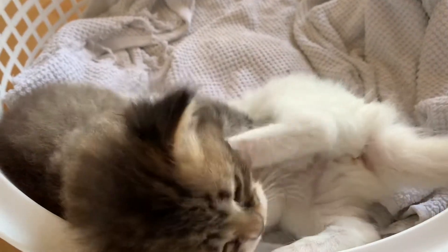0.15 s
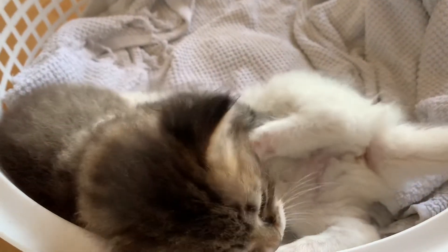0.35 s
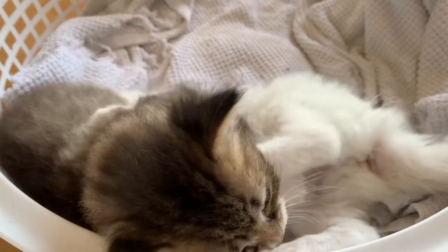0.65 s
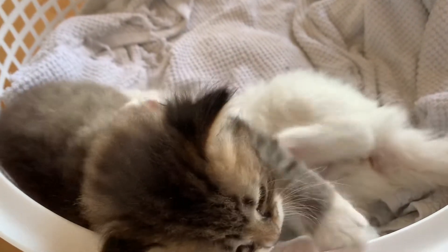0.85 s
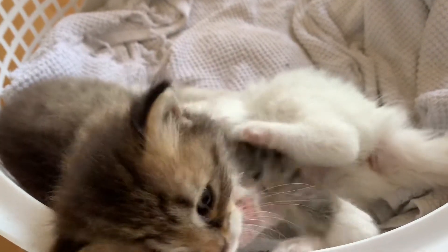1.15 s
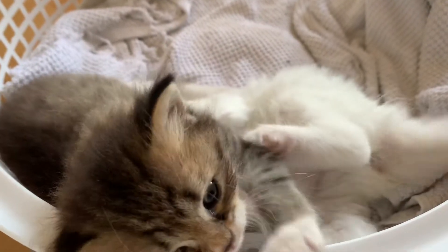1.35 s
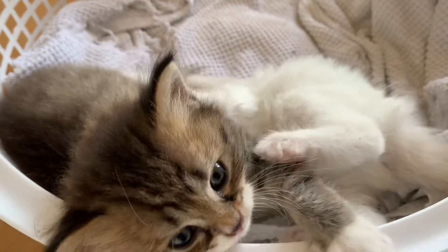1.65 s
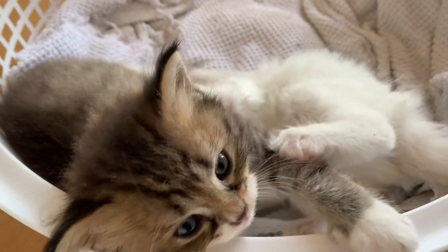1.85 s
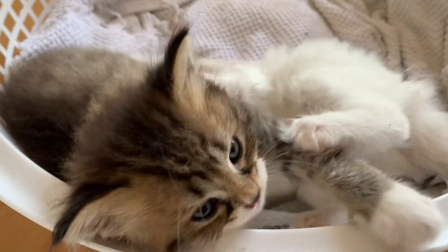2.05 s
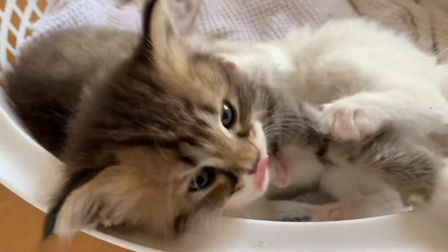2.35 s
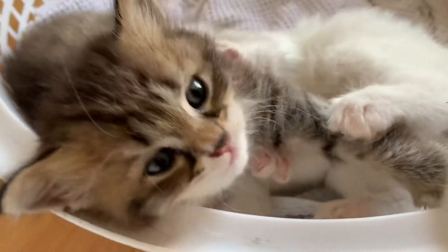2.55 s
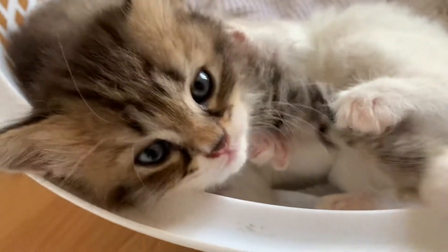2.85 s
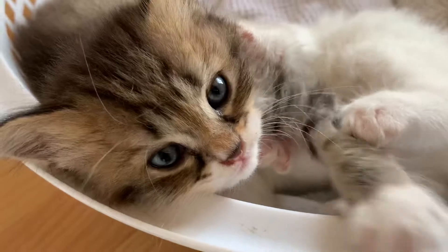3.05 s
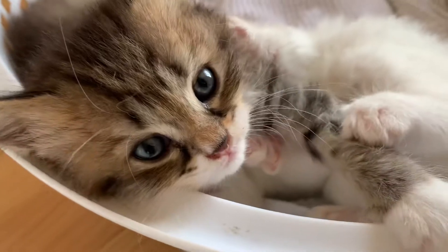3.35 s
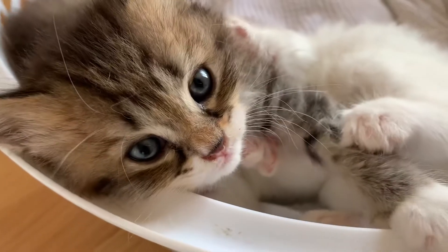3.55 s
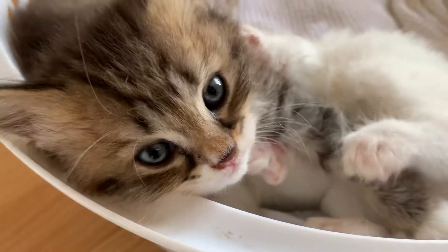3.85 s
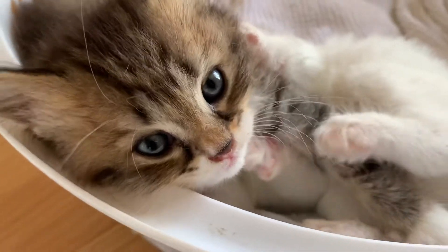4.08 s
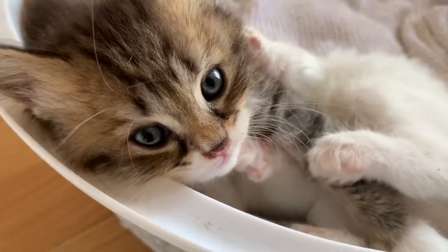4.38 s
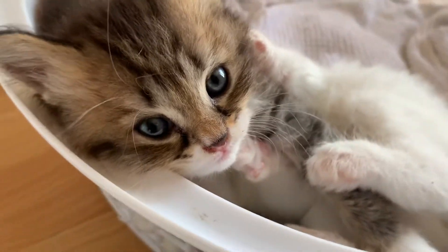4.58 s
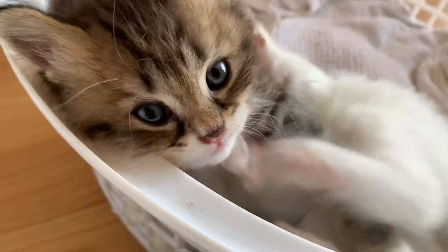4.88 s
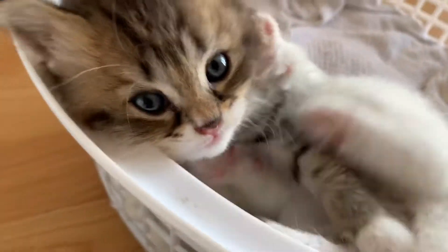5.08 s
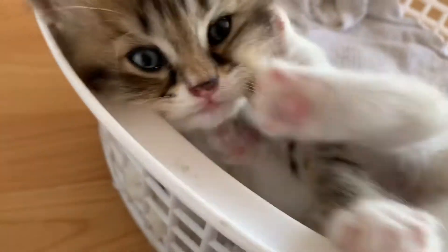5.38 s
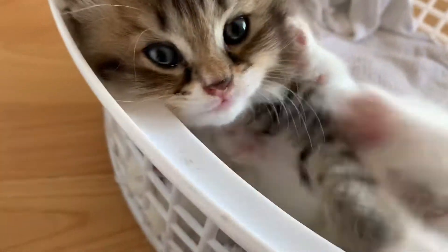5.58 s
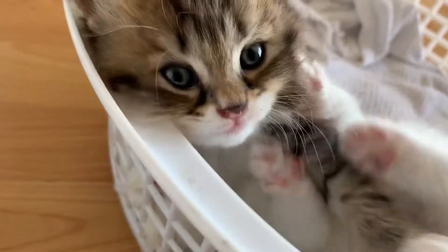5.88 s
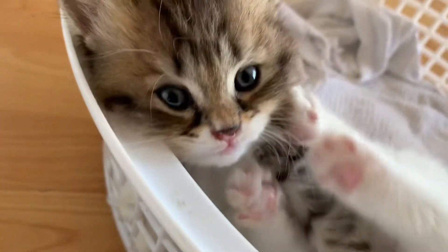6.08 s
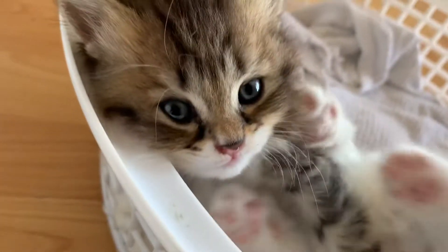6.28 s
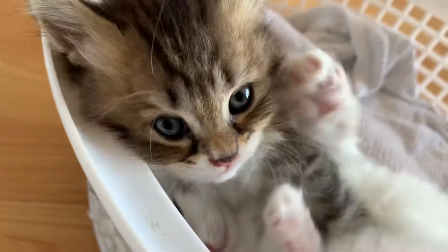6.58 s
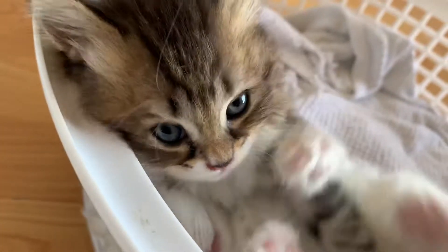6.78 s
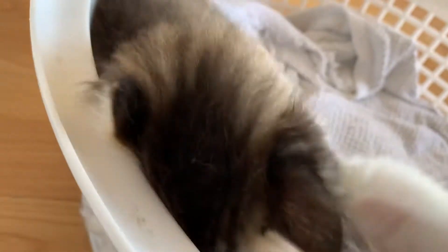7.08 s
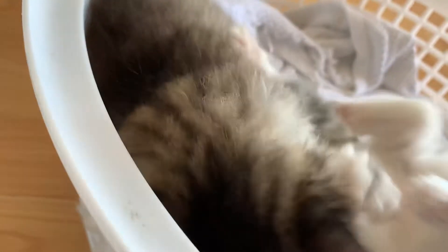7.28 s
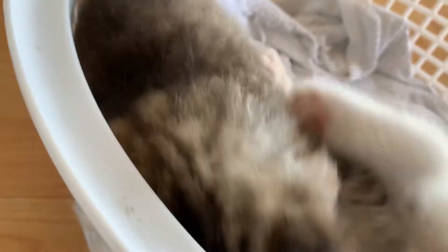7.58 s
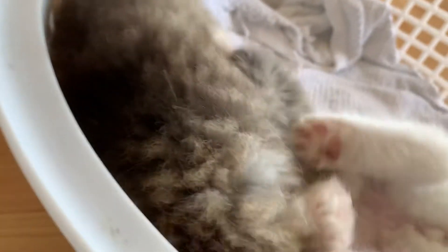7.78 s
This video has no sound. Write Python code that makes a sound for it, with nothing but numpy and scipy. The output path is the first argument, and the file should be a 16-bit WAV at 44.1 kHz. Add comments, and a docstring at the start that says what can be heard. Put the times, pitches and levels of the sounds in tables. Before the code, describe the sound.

Two kittens wrestle on towels in a plastic basket, with soft rustles, paw scuffs and light claw clicks over a low refrigerator hum.

```python
"""Two kittens wrestle on towels in a plastic laundry basket, close to a phone's two microphone ports.
Claws tick on the plastic, bodies bump it, fur and cloth rustle, paws scuff and rub along the wall.
One kitten gives a thin squeak. Further off to the left, a few taps ring in the room.
Behind it all, a little to the right, a refrigerator hums in the room's air and faint hiss."""
import sys
import numpy as np
from scipy import signal
from scipy.fft import rfft, irfft
from scipy.io import wavfile
from scipy.ndimage import map_coordinates

SR = 44100
rng = np.random.default_rng(int(sys.argv[2]) if len(sys.argv) > 2 else 0)


def log_audio(samples):
    """Write samples as a 16-bit WAV file to the path given in sys.argv[1]."""
    # one column per channel
    frames = np.atleast_2d(samples).T
    # limit to full scale, then quantise
    limited = np.clip(frames, -1, 1)
    pcm = np.round(limited * 32767).astype(np.int16)
    wavfile.write(sys.argv[1], SR, pcm)


N = 349624
TIME = np.arange(N) / SR
PORT_GAP_S = 0.000481  # travel time between the two ports
NEAR_LAG_S = 0.000295  # sound from the basket reaches the right port first


# claws on the basket, close up:
# t/s, ring level/dB, ring f/Hz, snap level/dB, snap f/Hz, tick level/dB, side (- left, + right)
CLAW_HITS = [(.7058, -51.5, 2560, -52.5, 3600, -45, 0.66), (.7295, -61.5, 2480, -59, 3610, -66, 0.52),
             (1.114, -69.5, 2280, -68.5, 4800, -70, 1), (1.162, -66, 2480, -73, 3900, -76, .63),
             (1.298, -65, 1810, -68, 3500, -73, 0.69), (1.3235, -66.5, 2700, -72, 3490, -77.5, 0.59),
             (2.1995, -52, 2950, -43.5, 4540, -48, -0.95), (2.232, -48.5, 2855, -50, 4520, -51, -1),
             (2.251, -52, 2700, -52, 4280, -55, -0.84), (2.278, -50.5, 2600, -50, 4400, -59, -1.3),
             (2.366, -62, 2700, -53, 4900, -59, -1.1), (3.091, -63, 2800, -53.5, 3570, -57.5, 0.59),
             (3.5345, -59, 2090, -60.5, 5100, -54.5, -1), (3.538, -61, 2030, -61, 5090, -58, -1.02),
             (3.7201, -55, 1810, -56, 4234, -46.5, 0.65), (4.8413, -50, 2520, -36, 5830, -35.5, 0.62),
             (4.8489, -52, 2410, -43.5, 4056, -47.5, 0.47), (4.858, -56.5, 2410, -60.5, 3750, -71.5, 0.74),
             (4.8684, -48.5, 2550, -45, 4300, -42.5, 0.56), (4.8822, -46, 2460, -54, 3847, -53, 0.77),
             (5.194, -49.5, 2294, -79, 3510, -76, -1), (5.1986, -40.5, 2310, -50, 4510, -52, -1.1),
             (5.242, -63, 2300, -63, 3750, -68, -0.71), (5.4818, -59.5, 2200, -55, 3620, -91, -0.21),
             (5.5501, -54.5, 1700, -60, 3970, -66, 0.52), (5.581, -66, 2600, -63, 3915, -68, 0.83)]
def claws():
    """Claws strike the plastic; every spot has its own pitch."""
    return clicks(CLAW_HITS, snap_t60=0.021, tick_t60=0.019, scatter=1.0, echo_s=0.0014)


# modes of the plastic: multiple of the ring pitch, t60/s, relative level/dB
PLASTIC_MODES = [(.27, .014, -17.5), (.56, 0.007, -11), (.88, 0.0036, -5), (1, 0.0088, -0.5),
                 (1.32, 0.018, -14)]
def clicks(table, snap_t60, tick_t60, scatter, echo_s):
    """Each contact is a hollow ring of the plastic, a hard snap and a bright tick."""
    out, t = np.zeros((2, N)), TIME[:SR // 20]
    bite = np.minimum(t / 0.0004, 1)  # a claw takes a moment to bite in
    shorten = np.sqrt(0.004 / 0.05)  # each 50 ms part carries the energy of 4 ms at its level
    for start, ring_db, ring_hz, snap_db, snap_hz, tick_db, side in table:
        ring = unit(sum(undb(db) * fade(t60) * np.sin(2 * np.pi * (ratio * ring_hz * t + rng.random()))
                        for ratio, t60, db in PLASTIC_MODES))
        snap = band(band(spray(snap_t60)[0], 3200, 8500), snap_hz / 1.23, snap_hz * 1.23, order=1)
        tick = band(band(spray(tick_t60)[0], 7200, 20000), 8000, 11200, order=1)
        click = undb(ring_db) * ring + bite * (undb(snap_db) * snap + undb(tick_db) * tick)
        add(out, start, ports(shorten * click, side * PORT_GAP_S, scatter, echo_s))
    return out


# bodies against the basket, close up: t/s, thud level/dB, knock level/dB
BODY_BUMPS = [(4.848, -44, -63), (4.881, -68, -58.5), (5.198, -55, -55), (5.548, -55, -63),
              (6.276, -60, -59)]
def bumps():
    """Under a kitten's weight the basket floor thuds and its wall gives a dull knock."""
    out = np.zeros((2, N))
    for start, thud_db, knock_db in BODY_BUMPS:
        thud = undb(thud_db) * burst(47, 200, t60=0.078)
        knock = undb(knock_db) * burst(380, 1200, t60=0.022)
        add(out, start, ports(thud + knock, NEAR_LAG_S, scatter=0.22, echo_s=0.0022))
    return out


# fur on towels, close up: t/s, length/s, level/dB, tilt/dB per octave, share spent swelling
TOWEL_STROKES = [(.708, 0.026, -54.5, 0.5, .3), (1.26, 0.38, -69, -4, .4), (2.2, 0.12, -53, 7, .2),
                 (3.09, 0.18, -65.5, 1.5, .35), (3.538, 0.042, -57, 4, .3), (3.53, 0.27, -65, 2.5, .2),
                 (3.688, 0.053, -54.5, -1, .2), (3.712, 0.077, -49.5, 4.5, .45),
                 (4.806, 0.098, -54.5, 2, .45), (4.83, 0.17, -68.5, 1, .3), (5.2, 0.2, -73.5, 2, .45),
                 (5.45, 0.074, -61, -0.5, .4), (5.505, 0.12, -59.5, 2.5, .22), (5.9, 0.83, -69, 0, .3),
                 (6.68, 0.21, -66, 0, .45), (6.88, 0.11, -64.5, 4, .3), (6.95, 0.24, -71.5, -4, .3)]
# spectrum of the cloth: f/Hz, relative level/dB
TOWEL_SPECTRUM = [(300, -12), (700, 4), (1300, 11), (2400, 8.5), (3000, 3), (4200, 7), (7000, 0.5),
                  (9000, 4), (13500, -6), (16000, -22)]
def towel_rustle():
    """Fur and towels slide over each other with a fine grain."""
    return strokes(TOWEL_STROKES, TOWEL_SPECTRUM, grain_db=1.5, judder_db=1.6, scatter=0.74)


# paws on the basket wall: t/s, length/s, level/dB, tilt/dB per octave, share spent swelling
PAW_STROKES = [(.81, 0.083, -58.5, 9.5, 0), (1.113, 0.02, -62, 3.5, 0), (1.42, 0.1, -63.5, 1.5, .4),
               (1.89, 0.095, -63.5, -3, 0.16), (1.98, 0.24, -67, 1.5, 0.44), (2.087, 0.17, -58, 0.5, .1),
               (2.165, 0.28, -53, 2.5, 0), (2.194, 0.14, -50, 2.5, 0.04), (2.25, 0.33, -62, 2, 0.2),
               (2.483, 0.031, -65.5, -2, .1), (2.61, 0.28, -62.5, -0.5, 0), (2.675, 0.078, -61.5, 0, 0.23),
               (2.87, 0.095, -63, -1, 0), (6.275, 0.057, -56.5, -2, 0.24), (6.29, 0.12, -60.5, -4, 0)]
# spectrum of the scuffed wall: f/Hz, relative level/dB
WALL_SPECTRUM = [(300, -15.5), (800, 4), (1500, 1), (2000, 2), (2600, 5), (3300, -1.5), (4400, 3),
                 (7000, -4.5), (8400, -3.5), (11000, -15.5), (14000, -19.5), (16000, -46)]
def paw_scuffs():
    """Paws drag along the plastic with a coarser grain and more judder."""
    return strokes(PAW_STROKES, WALL_SPECTRUM, grain_db=3.0, judder_db=2.5, scatter=1.7)


def strokes(table, spectrum, grain_db, judder_db, scatter, judder_per_s=24):
    """Broad rustles that judder as the paw grips and slips."""
    out = np.zeros((2, N))
    for start, length, db, tilt_db, rise in table:
        grains, swell = friction(length, rise, grain_db)
        grip = unit(undb(judder_db * walk(judder_per_s, len(swell))))
        stroke = undb(db) * swell * grip * colour(grains, spectrum, tilt_db)
        add(out, start, ports(stroke, NEAR_LAG_S, scatter, echo_s=0.02))
    return out


def friction(length, rise, grain_db, snags_per_s=31, snag_db=16):
    """Fibres catch and let go, claws snag in the weave: grainy noise, and the swell of one stroke."""
    t = TIME[:SR]
    top_s = length * np.clip(rise, 0.03, 0.9)
    swell = np.interp(t, [0, top_s, length], [0, 1, 0]) ** np.where(t < top_s, 0.7, 0.42)
    snags = undb(snag_db) * (rng.random(len(t)) < snags_per_s / SR)
    grains = rng.standard_normal(len(t)) * (undb(grain_db * walk(300, len(t))) + snags)
    return grains, swell


# slightly squeaky rubs in the basket, and short rings after the knocks at 2.09 s and 6.28 s: t/s, length/s,
# level/dB, f/Hz, bandwidth/Hz
NARROW_RUBS = [(0.795, 0.028, -62.5, 2324, 700), (0.803, 0.044, -58, 8150, 300),
               (1.234, 0.013, -63, 1830, 200), (1.278, 0.31, -69, 3730, 650),
               (1.437, 0.19, -61.5, 3380, 755), (1.811, 0.09, -72.5, 1920, 404),
               (1.904, .06, -70.5, 2320, 600), (2.085, .035, -50.5, 1530, 400),
               (2.194, 0.023, -41.5, 4500, 600), (2.206, 0.099, -48, 3740, 2000),
               (3.334, 0.24, -74.5, 3670, 800), (4.222, 0.3, -79, 3700, 1000),
               (4.662, 0.096, -80.5, 5270, 900), (4.754, .05, -82, 3000, 400),
               (6.278, 0.0083, -60, 3310, 300), (6.279, 0.091, -65, 2470, 600),
               (6.568, 0.17, -72.5, 5270, 1006)]
def rubs():
    """Friction sings in one narrow, wandering resonance."""
    out = np.zeros((2, N))
    for start, length, db, hz, width in NARROW_RUBS:
        grains, swell = friction(length, rise=0.3, grain_db=4.0)
        wander = np.cumsum(1 + 0.012 * walk(21, len(grains)))  # uneven read speed bends the pitch
        sing = map_coordinates(band(grains, hz - width / 2, hz + width / 2), [wander])
        add(out, start, ports(undb(db) * swell * sing, NEAR_LAG_S, scatter=2.4, echo_s=0.0089))
    return out


def squeak():
    """A kitten's thin, shaky whistle shoots up, wavers and sags; its octave flares as it lets go."""
    top_s, top_hz, hold_s = 0.464, 4170, 0.033
    rise_hz_per_s, sag_hz_per_s, waver_hz = 55000, 14000, 55
    sag_time = TIME - top_s - hold_s
    below_top = rise_hz_per_s * np.maximum(top_s - TIME, 0) + sag_hz_per_s * np.maximum(sag_time, 0)
    waver = waver_hz * np.cos(2 * np.pi * sag_time / hold_s) * np.clip(0.5 - sag_time / hold_s, 0, 1)
    hz = np.maximum(top_hz - below_top + waver, 0)
    phase = 2 * np.pi * np.cumsum(hz * (1 + 0.004 * walk(60))) / SR
    swell = np.exp(-0.5 * (sag_time / 0.04) ** 2) * (hz / top_hz) ** 2 * undb(1.2 * walk(60))
    octave = undb(1) * np.exp(-((sag_time - 0.016) / 0.012) ** 2)
    call = np.sqrt(2) * undb(-71) * swell * (np.sin(phase) + octave * np.sin(2 * phase))
    return ports(call, NEAR_LAG_S, scatter=0.45, echo_s=0.0064)[:, :N]


# taps further off in the room, and at 6.28 s a knock on the basket itself: t/s, ring level/dB, ring f/Hz, snap
# level/dB, snap f/Hz, tick level/dB
FAR_TAPS = [(.807, -59.5, 2500, -58, 3500, -67), (0.8131, -49, 2270, -49.5, 4170, -55),
            (1.8232, -58.5, 1920, -74.5, 3690, -80.5), (2.024, -78.5, 2300, -65, 4400, -72),
            (2.069, -70, 2200, -64.5, 4380, -65.5), (2.092, -54.5, 2474, -55, 4630, -65),
            (2.18, -50.5, 2290, -57.5, 5200, -65), (2.4865, -55.5, 2570, -53, 3900, -68),
            (2.495, -58, 3010, -54.5, 3700, -72), (2.6201, -58, 2550, -55, 4400, -68),
            (2.722, -70, 2530, -61, 5200, -65), (2.8596, -64, 2780, -51.5, 5450, -63),
            (2.9702, -59, 2130, -61.5, 5700, -83), (6.276, -46.5, 2580, -57, 3300, -53.5)]
def far_taps():
    """Hard contacts off to the left, with longer reflections than the claws."""
    from_left = [(*tap, -1) for tap in FAR_TAPS]
    return clicks(from_left, snap_t60=0.019, tick_t60=0.022, scatter=0.86, echo_s=0.004)


# the strongest drone, the compressor's second order: t/s, relative level/dB
DRONE_CURVE = [(0.0, -43.5), (0.52, -41), (0.65, -46.5), (1.43, -42.5), (1.55, -58.5), (1.7, -46.5),
               (3.59, -48.5), (3.77, -57), (4.28, -38.5), (4.36, -46), (5.55, -43.5), (5.79, -70),
               (5.83, -48), (6.48, -40), (6.62, -58), (7.12, -38.5)]
# tones of a loose panel, the compressor, the mains and the cabinet: f/Hz, relative level/dB, waver 0-1
PANEL_TONES = [(86.4, -51.5, 0.5)]
COMPRESSOR_TONES = [(48.48, -43, 0.24), (147.6, -56.5, 0.8), (192.5, -49, 0.2), (249.4, -69, 0.3),
                    (396.2, -76, 0.6), (486.4, -80.5, 0.8)]
MAINS_TONES = [(99.5, -54.5, 0.29), (200.4, -57.5, 0.057), (300.1, -60, 0.2), (398.4, -72, .3)]
CABINET_TONES = [(70.5, -64.5, 1), (114.2, -64.5, 1), (245.3, -60.5, 1), (250.9, -59, 0.86),
                 (267.3, -64.5, 0.73), (288.7, -61.5, .6), (296.8, -65.5, 0.62), (342.8, -73.5, 0.82),
                 (389, -70, 0.94)]
# the refrigerator's rumble: f/Hz, relative level/dB
RUMBLE_SPECTRUM = [(20, -28.5), (40, -21.5), (60, 0.5), (88, -0.5), (125, -7.5), (165, -7.5), (205, -5.5),
                   (280, -8.5), (350, -16), (450, -27), (700, -50), (2000, -67)]
def refrigerator():
    """Compressor, mains and cabinet hum over a low rumble, a little louder at the right port."""
    drone_db = np.interp(TIME, *np.transpose(DRONE_CURVE)) - 1
    tones = hum([(96.7, drone_db, 0.21)] + PANEL_TONES, waver_per_s=3.1)
    tones += hum(COMPRESSOR_TONES, waver_per_s=0.91)
    tones += hum(MAINS_TONES, waver_per_s=0.47)
    tones += hum(CABINET_TONES, waver_per_s=1.33)
    rumble = undb(-48.5) * colour(diffuse(N), RUMBLE_SPECTRUM) * undb(0.66 * walk(2.0))
    return (tones + rumble) * undb([[-1.3], [1.2]])


def hum(tones, waver_per_s):
    """Tones waver on their own; standing waves make the ports differ more as the pitch rises."""
    out = np.zeros((2, N))
    for hz, db, waver in tones:
        drift = (walk(waver_per_s) + 1j * walk(waver_per_s)) / np.sqrt(2)
        sway = unit(1 - min(waver, 1) / 2 + waver * drift)
        port_phase = np.array([[1], [-1]]) * hz * PORT_GAP_S * (2.7 * walk(waver_per_s) - 0.9)
        phase = 2 * np.pi * (hz * TIME + rng.random()) + port_phase
        out += np.sqrt(2) * undb(db) * np.real(sway * np.exp(1j * phase))
    return out


# the room's air, and the hiss at each port: f/Hz, relative level/dB
AIR_SPECTRUM = [(100, -5), (400, -3.5), (650, 0.5), (850, -4), (1050, -7), (1400, -15), (2000, -23.5),
                (5000, -43), (16000, -53)]
HISS_SPECTRUM = [(1000, 7), (3500, 4), (7000, 1), (10000, 4), (14000, -2.5), (15500, -14)]
def room_tone():
    """Air from all sides, a little louder at the left port, and a faint even hiss."""
    air = undb(-67.5) * colour(diffuse(N), AIR_SPECTRUM) * undb(0.5 * walk(0.82))
    hiss = undb(-79) * colour(rng.standard_normal((2, N)), HISS_SPECTRUM)
    return air * undb([[1.2], [-1.2]]) + hiss


def room(pair, t60_low, t60_high):
    """The room answers with a diffuse tail whose treble dies sooner."""
    t, noise = TIME[:SR], diffuse(SR)
    low = signal.sosfiltfilt(signal.butter(2, 6000, fs=SR, output="sos"), noise)
    tail = low * undb(-60 * t / t60_low) + (noise - low) * undb(-60 * t / t60_high)
    build_up = 1 - np.exp(-t / 0.0063)
    return signal.fftconvolve(pair, unit(tail * build_up) / np.sqrt(SR), axes=1)[:, :N]


def ports(x, lag_s, scatter, echo_s):
    """A sound at the two ports, the left late by about lag_s, with reflections dying over echo_s."""
    echoes = spray(np.log(1000) * echo_s)
    scattered = signal.fftconvolve(x[None], echoes / np.sqrt(echoes.shape[1]), axes=1)
    n = scattered.shape[1]
    lags = PORT_GAP_S + np.array([[0.5], [-0.5]]) * (lag_s + 0.00002 * rng.standard_normal())
    straight = irfft(rfft(x, n) * np.exp(-2j * np.pi * np.fft.rfftfreq(n, 1 / SR) * lags), n)
    return (straight + scatter * scattered) / np.hypot(1, scatter)


def diffuse(n):
    """Noise from all sides: alike at both ports in the bass, unrelated in the treble."""
    alike = np.sinc(2 * np.fft.rfftfreq(n, 1 / SR) * PORT_GAP_S)
    mid, side = rfft(rng.standard_normal((2, n))) * np.sqrt([1 + alike, 1 - alike + 1e-9])
    return irfft([mid + side, mid - side], n) / np.sqrt(2)


def spray(t60):
    """Two unrelated dying showers of tiny impulses, each with an even spectrum; rms 1."""
    decay = undb(-60 * TIME[:SR // 20] / t60)
    spectrum = rfft(rng.standard_normal((2, len(decay))) * decay)
    return unit(irfft(spectrum / np.abs(spectrum), len(decay)) * np.sqrt(decay))


def burst(low_hz, high_hz, t60):
    """A dying band of noise."""
    return band(rng.standard_normal(SR // 20) * fade(t60), low_hz, high_hz)


def fade(t60):
    """50 ms of decay after a very quick onset."""
    t = TIME[:SR // 20]
    return undb(-60 * t / t60) * np.minimum(t / 0.00033, 1) ** 2


def band(x, low_hz, high_hz, order=2):
    """Band-pass; rms 1."""
    return unit(signal.sosfilt(signal.butter(order, [low_hz, high_hz], "band", fs=SR, output="sos"), x))


def colour(x, points, tilt_db=0):
    """Give a sound a spectrum of (f/Hz, level/dB) points, tilted per octave; rms 1."""
    n = x.shape[-1]
    octave = np.log2(np.fft.rfftfreq(n, 1 / SR) + 1)
    hz, db = np.transpose(points)
    gain = undb(np.interp(octave, np.log2(hz), db) + tilt_db * np.maximum(octave, np.log2(hz[1])))
    return unit(irfft(rfft(x) * gain, n))


def walk(rate, n=N):
    """Smooth random drift with spread 1, changing about rate times a second."""
    hop = 100
    smoothing = np.exp(-0.5 * (np.fft.rfftfreq(N // hop, hop / SR) / rate) ** 2)
    slow = unit(irfft(rfft(rng.standard_normal(N // hop)) * smoothing))
    return np.interp(np.arange(n) / hop, np.arange(len(slow)), slow)


def add(out, start, x):
    """Mix a short two-channel sound in at its time."""
    i = int(start * SR)
    out[:, i:i + x.shape[1]] += x[:, :N - i]


def undb(db):
    """Decibels to gain."""
    return 10 ** (np.asarray(db) / 20)


def unit(x):
    """Scale to rms 1."""
    return x / np.sqrt(np.mean(np.abs(x) ** 2))


def scene():
    """Claws and towels are close and dry; the scuffs and the further taps carry more room."""
    hits = claws() + bumps()
    rustle = towel_rustle()
    taps = far_taps()
    scuffs = paw_scuffs()
    squeaks = rubs() + squeak()
    direct = hits + rustle + taps + scuffs + squeaks
    into_room = (undb(-25) * hits + undb(-13) * rustle + undb(-3.5) * taps
                 + undb(-7) * scuffs + undb(-20) * squeaks)
    tail = room(into_room, t60_low=0.54, t60_high=0.26)
    return (direct + tail) * undb([[0.3], [-0.3]]) + refrigerator() + room_tone()


def record(dry):
    """The phone cuts the top treble; the sound stops shortly before the end."""
    top_hz, stop_s = 15800, 7.175
    running = np.clip((stop_s - TIME) / 0.012, 0, 1)
    return signal.sosfilt(signal.ellip(8, 0.2, 70, top_hz, fs=SR, output="sos"), dry * running)


dry = scene()
out = record(dry)
log_audio(out)
```